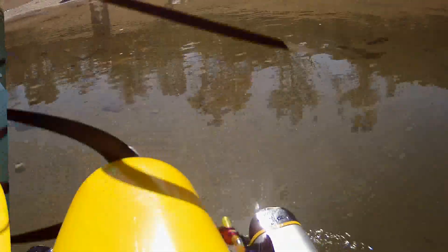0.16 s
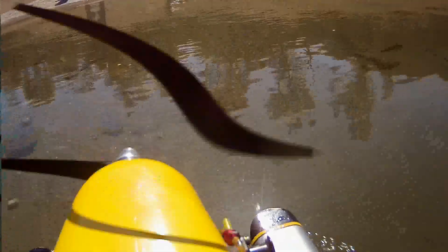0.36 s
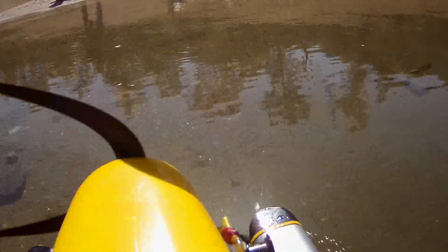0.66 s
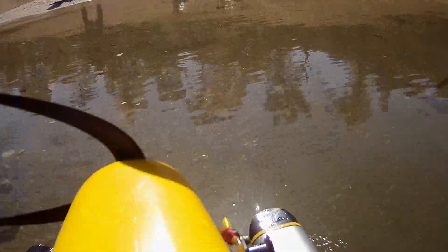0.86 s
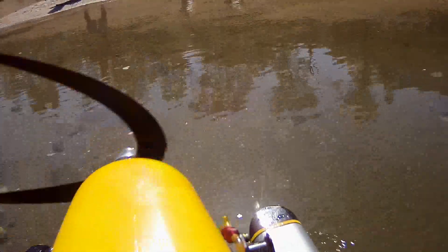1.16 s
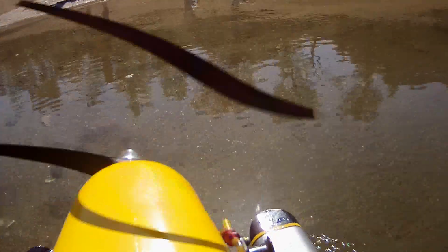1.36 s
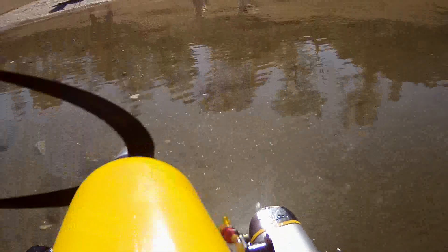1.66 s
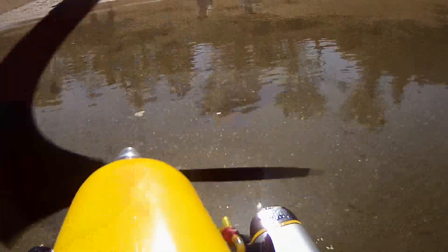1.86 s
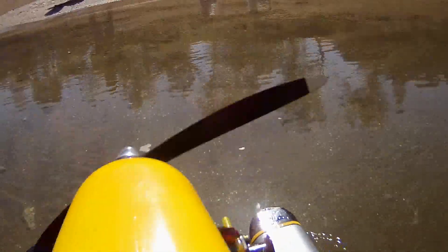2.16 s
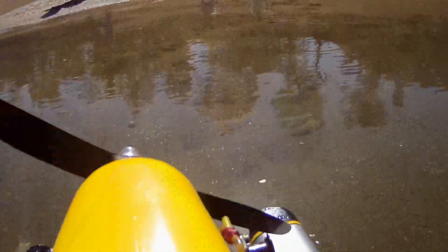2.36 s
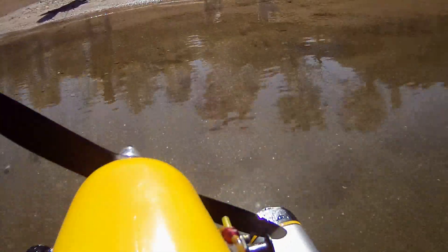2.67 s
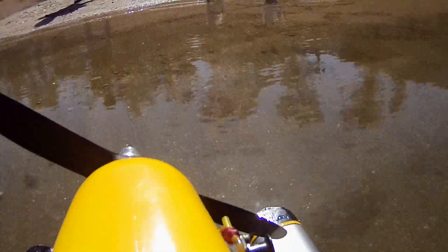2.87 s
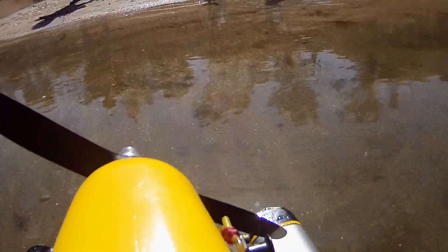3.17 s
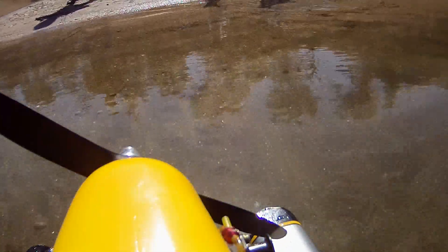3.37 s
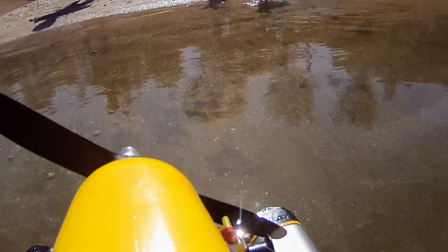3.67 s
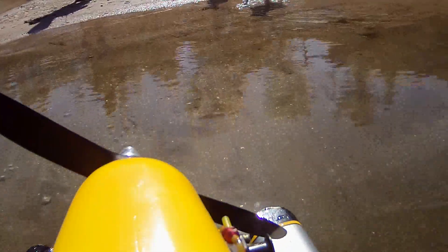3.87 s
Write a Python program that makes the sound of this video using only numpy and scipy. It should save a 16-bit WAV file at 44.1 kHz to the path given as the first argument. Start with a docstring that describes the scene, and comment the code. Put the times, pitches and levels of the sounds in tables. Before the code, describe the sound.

A small petrol engine on a model floatplane throbs loudly and steadily at a low, buzzing pitch, crackling with exhaust gas until about 0.55 s. The throttle closes: uneven soft puffs, with sharp pops until about 1.3 s, mix with hollow knocks and loose metallic rattling. Firings end near 1.8 s; knocks weaken and stop by 2.5 s. Low rocking fades, leaving faint open air and a thin high whine until 4 s.

```python
"""On board a model floatplane on a calm lake: a small petrol engine throbs steadily, gas crackling in every cycle.
The throb is a stack of partials locked to the firing rate; the gas is coloured noise, with a few sharp pops.
The throttle closes: stray firings puff as single swings of pressure while the slowing piston knocks the airframe,
rings its modes and shakes loose parts. The frame's rocking dies away with the last knocks,
leaving faint open air (coloured noise) and a thin electrical whine (wavering sines)."""
import sys
import numpy as np
from scipy import signal
from scipy.fft import rfft, irfft
from scipy.io import wavfile
from scipy.ndimage import uniform_filter1d

SR = 44100
rng = np.random.default_rng(int(sys.argv[2]) if len(sys.argv) > 2 else 0)


def generate_wav(signal):
    """Clip the signal to [-1, 1] and save it as 16-bit WAV at the path in sys.argv[1]."""
    frames = np.transpose(np.atleast_2d(signal))
    scaled = np.clip(frames, -1, 1) * 32767
    pcm = np.round(scaled).astype(np.int16)
    wavfile.write(sys.argv[1], SR, pcm)


N = 176400


def undb(db):
    """Decibels to gain."""
    return 10 ** (np.asarray(db) / 20)


def unit(x):
    """Scale to rms 1."""
    return x / np.sqrt(np.mean(x ** 2))


def noise():
    """White noise of rms about 1."""
    return rng.standard_normal(N)


def walk(rate_hz):
    """Smooth random curve of rms 1, drawing rate_hz new values a second."""
    step = max(int(SR / rate_hz), 2)
    joined = np.interp(np.arange(N) / step, np.arange(N), noise())
    return unit(uniform_filter1d(joined, step))


def colour(x, points):
    """Causal, minimum-phase filter through (f/Hz, level/dB) points that keeps the power of white noise."""
    hz, db = np.array(points, float).T
    f = np.maximum(np.arange(N // 2 + 1) * SR / N, 1)
    gain = unit(undb(np.interp(np.log(f), np.log(hz), db)))
    # folding the cepstrum forward in time makes the response causal
    cepstrum = irfft(np.log(gain), N)
    cepstrum[1:N // 2] *= 2
    cepstrum[N // 2 + 1:] = 0
    response = irfft(np.exp(rfft(cepstrum)), N)[:N // 8]
    return irfft(rfft(x, 2 * N) * rfft(response, 2 * N))[:N]


def grit(spread_db):
    """Noise made of tiny clicks of uneven size, rms 1."""
    size = np.clip(noise(), -2.5, 2.5)
    return unit(noise() * undb(spread_db * size))


def die_away(kicks, decay_s):
    """Each kick jumps up and falls exponentially."""
    return signal.lfilter([1], [1, -np.exp(-1 / (decay_s * SR))], kicks)


def bursts(rows, decay_s):
    """Envelope that jumps at each (t/s, level/dB) row and dies away."""
    kicks = np.zeros(N)
    for s, db in rows:
        kicks[int(s * SR)] += undb(db)
    return die_away(kicks, decay_s)


CONTACT_S = .0019


def contact(age):
    """A soft blow takes about CONTACT_S to press in."""
    return 1 - np.exp(-(age / CONTACT_S) ** 2)


def ring_down(age, t60):
    """Damping: falls 60 dB in t60 seconds."""
    return np.exp(-np.log(1000) * age / t60)


# ringing modes of the airframe [f/Hz, level/dB, t60/s]
FRAME_MODES = [(207, -13.5, .09), (235.8, -9.5, .15), (292, -9.5, .11), (365, -9.5, .07), (446, -11, 0.091),
               (583.5, -18, .14), (622.5, -23, .13), (707, -32.5, .09), (890, -33.5, .1), (972, -39, .09),
               (1230, -42.5, .06)]


def strike(rows, scatter_db, detune):
    """Each soft (t/s, level/dB) blow rings the airframe modes in a slightly different mix and tuning."""
    out, age = np.zeros(N + SR), np.arange(SR // 5) / SR
    hz, mode_db, t60 = np.array(FRAME_MODES).T[:, :, None]
    for s, blow_db in rows:
        size, shift = rng.uniform(-1, 1, (2, len(FRAME_MODES), 1))
        level = undb(blow_db + mode_db + scatter_db * size)
        tone = np.sin(2 * np.pi * hz * (1 + detune * shift) * age)
        ring = level * ring_down(age, t60) * tone
        start = int(s * SR)
        out[start:start + len(age)] -= contact(age) * ring.sum(0)
    return out[:N]


# partials of the throb [multiple of the firing rate, level/dB]
THROB_PARTIALS = [(.5, -14), (1, -0.5), (1.5, -28), (2, -20), (3, -16.5), (4, -34), (5, -36), (6, -24),
                  (7, -29), (9, -29.5), (11, -34.5)]
ORDER_WANDER = 0.0092  # turns (rms) by which each upper partial wavers


def throb(turns):
    """Exhaust pressure repeats with the firings: partials locked to one phase, the upper ones loosely."""
    total = np.zeros(N)
    for multiple, db in THROB_PARTIALS:
        waver = (multiple > 3.5) * ORDER_WANDER * walk(30)
        total += undb(db) * np.cos(2 * np.pi * multiple * (turns + waver))
    return unit(total) * undb(1.5 * np.tanh(walk(45)))


# colour of the exhaust gas, running and sputtering [f/Hz, level/dB per Hz, relative]
GAS_COLOUR = [(200, 9), (500, 2.5), (800, 3), (1400, 4), (1850, -6), (2150, -2.5), (2500, -8), (2900, -3.5),
              (3250, -9), (3700, -1.5), (4000, -8.5), (4250, -14.5), (5200, -21), (8000, -29),
              (14000, -71.5)]
RUN_GAS_DB, GAS_FADE_DB_PER_S = -28.5, 2
GAS_PULSE_DB, GAS_FLUTTER_DB = 2.5, 5.5


def running_gas(t, turns):
    """Gas rushes out as noise that swells twice a cycle and flutters."""
    pulse_db = GAS_PULSE_DB * np.cos(4 * np.pi * turns)
    flutter_db = GAS_FLUTTER_DB * np.tanh(walk(400))
    gas = unit(undb(pulse_db + flutter_db) * noise())
    return colour(gas, GAS_COLOUR) * undb(RUN_GAS_DB - GAS_FADE_DB_PER_S * t)


# colour of the open exhaust's fine spitting [f/Hz, level/dB per Hz, relative]
SPIT_COLOUR = [(2000, 0.5), (7000, -1.5), (14000, -7), (20000, -12.5)]
SPIT_DB, SPITS_PER_S, SPIT_S = -50.5, 400, .0006


def spitting():
    """The open exhaust spits at random moments: dense, very short bursts of noise."""
    ticks = 1. * (rng.random(N) < SPITS_PER_S / SR)
    return colour(unit(die_away(ticks, SPIT_S) * noise()), SPIT_COLOUR) * undb(SPIT_DB)


# steady firing rate, time of the last even firing, moment the throttle closes
FIRING_HZ, LAST_FIRING_S, CUT_S = 54.3, .542, .556
THROB_DB, RUN_KNOCK_DB = -6, -20.5


def running(t):
    """Even firings drive the throb, the gas and one airframe knock per cycle."""
    turns = FIRING_HZ * (t - LAST_FIRING_S) + 0.014 * walk(25)
    on = np.clip((CUT_S - t) / 0.0035, 0, 1)  # closes over 3.5 ms
    exhaust = undb(THROB_DB) * throb(turns) + running_gas(t, turns) + spitting()
    firings = np.arange(LAST_FIRING_S, 0, -1 / FIRING_HZ)
    late, harder = rng.standard_normal((2, len(firings)))
    blows = zip(np.abs(firings + 0.0014 * late), RUN_KNOCK_DB + 2 * harder)
    return on * exhaust + strike(blows, scatter_db=6, detune=0.039)


# rocking of the frame on its mounts [t/s, level/dB]
ROCKING_LEVEL = [(.55, -16), (1.3, -19), (1.8, -25.5), (1.9, -21), (1.98, -20), (2.09, -35), (2.2, -33.5),
                 (2.34, -40.5), (2.38, -48.5), (2.55, -46.5), (2.63, -52.5), (3.0, -66), (3.3, -77.5)]
# colour of the frame's slack shudder [f/Hz, level/dB per Hz, relative]
SHUDDER_COLOUR = [(12, -13.5), (25, 7.5), (50, -5), (95, -2), (130, -7.5), (200, -22), (400, -28),
                  (1000, -78.5)]
ROCK_HZ, SHUDDER_DB = 60.01, -1


def rocking(t):
    """The frame sways (wandering low tone) and shudders (low noise) on its mounts, dying away."""
    hz = ROCK_HZ * (1 + .07 * walk(20))
    sway = np.sqrt(2) * np.sin(2 * np.pi * np.cumsum(hz) / SR) * undb(-0.5 + 1.6 * walk(25))
    shudder = undb(SHUDDER_DB) * colour(noise(), SHUDDER_COLOUR)
    return undb(np.interp(t, *np.array(ROCKING_LEVEL).T)) * (sway + shudder)


# colour of the faint open air [f/Hz, level/dB per Hz, relative]
AIR_COLOUR = [(20, -10), (62, 0), (100, -4.5), (140, -12), (168, -8.5), (230, -14), (330, -15),
              (500, -19.5), (1000, -23), (2000, -28.5), (3500, -31.5), (6000, -35.5), (14000, -36.5)]
AIR_DB = -62.5


def lake_air():
    """Faint open air over the lake: coloured noise that drifts slightly in level."""
    return colour(noise(), AIR_COLOUR) * undb(AIR_DB + .6 * walk(4))


# thin electrical whine [f/Hz, level/dB, rms wobble/Hz]
WHINE_TONES = [(3740, -82, 40), (12000, -91, 4)]


def whine():
    """Each electrical tone is a sine whose pitch wavers at random."""
    total = np.zeros(N)
    for hz, db, wobble in WHINE_TONES:
        cycles = np.cumsum(hz + wobble * walk(150)) / SR
        total += undb(db) * np.sqrt(2) * np.sin(2 * np.pi * cycles)
    return total


# sharp exhaust pops [t/s, level/dB before colouring]
POP_TIMES = [(0.059, -15), (.096, -19.5), (.177, -16), (.215, -18), (.374, -26), (0.448, -26),
             (0.5253, -18.5), (.616, -23), (0.654, -11), (0.693, -19.5), (0.8726, -18), (1.027, -27.5),
             (1.119, -29.5), (1.25, -38), (1.295, -46)]
# sputtering puffs [t/s, relative pressure level/dB, f/Hz, relative hiss level/dB]
PUFF_TIMES = [(0.584, -3, 64.5, -30), (0.624, -4, 62.7, -36), (.636, -5, 66, -47.5),
              (0.672, -0.5, 58, -28.5), (.712, -4, 61.3, -34.5), (0.753, -8.5, 69.3, -58),
              (0.798, -4.5, 65, -38.5), (0.839, -6, 52.3, -43), (0.889, 0.5, 63.2, -32),
              (0.931, -1.5, 60, -38), (0.966, -9, 56, -64), (1.024, -3, 61.4, -35.5),
              (1.061, -22, 45.8, -54.5), (1.116, -2.5, 62.4, -35.5), (1.154, -15, 46, -66.5),
              (1.214, -2.5, 54.2, -48.5), (1.257, -6, 52.7, -46), (1.272, -3, 53, -44),
              (1.304, -6.5, 56.6, -59), (1.365, -21, 40.7, -53.5), (1.414, -11.5, 44, -58),
              (1.476, -3.5, 49, -53), (1.52, -8.5, 54.5, -50), (1.534, -3.5, 65.7, -69.5),
              (1.571, -8.5, 46.5, -54.5), (1.632, -5, 41.3, -56), (1.693, -4.5, 61.7, -58),
              (1.733, -5, 48.4, -61.5), (1.802, -8.5, 42, -55)]
# small cracks of gas [t/s, level/dB before colouring]
CRACK_TIMES = [(.577, -26.5), (.586, -25), (.591, -25), (.674, -24.5), (.717, -30), (.801, -28),
               (.831, -37.5), (.884, -34), (.8945, -25.5), (.933, -28)]
PUFF_DB, PUFF_CYCLES = -1.8, 0.7
HISS_DB, HISS_S, CRACK_S = -0.5, 0.0083, .0015
POP_DECAY_S, POP_RING_HZ, POP_RING_DB = .003, 1432, -10
PIPE_HZ, PIPE_DB, PIPE_S = 165.3, -14, 0.012  # low ring of the exhaust pipe after each puff


def sputter(t):
    """Stray firings swing the pressure once and hiss; pops ring the muffler, puffs ring the pipe."""
    thump, hiss = np.zeros(N), np.zeros(N)
    for s, db, hz, hiss_db in PUFF_TIMES:
        near = slice(int(s * SR) - SR // 10, int(s * SR) + SR // 10)
        age = t[near] - s
        swing = 2 * np.pi * hz * age
        swell = np.exp(-(age * hz / PUFF_CYCLES) ** 2)
        thump[near] += undb(db) * swell * (np.cos(swing) + 0.14 * np.cos(2 * swing))
        hiss[near] += undb(hiss_db) / np.cosh(age / HISS_S)
    pops = bursts(POP_TIMES, POP_DECAY_S)
    cracks = bursts(CRACK_TIMES, CRACK_S)
    crackle = unit(grit(spread_db=4.0) * undb(6.2 * np.tanh(walk(250))))
    gas = undb(HISS_DB) * hiss * crackle + (pops + cracks) * noise()
    muffler = undb(POP_RING_DB) * pops * np.sin(2 * np.pi * POP_RING_HZ * t)
    puffs = bursts([row[:2] for row in PUFF_TIMES], PIPE_S)
    pipe = undb(PIPE_DB) * puffs * np.sin(2 * np.pi * PIPE_HZ * t)
    soften = signal.butter(4, 2 * PIPE_HZ, fs=SR, output="sos")
    return undb(PUFF_DB) * thump + colour(gas, GAS_COLOUR) + muffler + signal.sosfilt(soften, pipe)


# knocks of the slowing piston, shared by thuds, frame and fittings [t/s, relative level/dB, f/Hz]
PISTON_KNOCKS = [(0.6347, -12.5, 304), (0.6473, -20, 425), (0.6835, -18, 289.0), (0.716, -13.5, 309.0),
                 (0.7607, -14.5, 333), (0.8086, -17.5, 324), (0.8663, -14, 301.0), (0.8921, -18, 353),
                 (0.942, -17.5, 302), (0.9837, -18.5, 341), (1.0338, -17, 325), (1.0777, -19, 327),
                 (1.1247, -15.5, 308), (1.178, -19.5, 375), (1.2302, -13.5, 338), (1.2768, -15.5, 301),
                 (1.33, -17, 315), (1.3853, -17, 320), (1.442, -17, 314), (1.4955, -15.5, 320),
                 (1.5437, -16.5, 312), (1.5999, -17.5, 299), (1.6538, -14.5, 310), (1.704, -17.5, 384.0),
                 (1.765, -19, 310), (1.8303, -16.5, 308.0), (1.8508, -25, 287), (1.8869, -17.5, 305),
                 (1.9258, -27.5, 326.0), (1.9665, -23, 296), (2.005, -23, 340), (2.1202, -29, 302),
                 (2.2117, -29, 322.0), (2.2392, -26, 309), (2.353, -49, 338), (2.5216, -51.5, 298.0)]
THUD_DB, THUD_T60_S = -.5, 0.059


def thuds():
    """Each turnover jolts the engine mount: a few damped cycles with their own pitch."""
    out, age = np.zeros(N), np.arange(SR // 5) / SR
    shape = contact(age) * ring_down(age, THUD_T60_S)
    shape /= shape.max()
    for s, db, hz in PISTON_KNOCKS:
        start = int(s * SR)
        out[start:start + len(age)] -= undb(db) * shape * np.sin(2 * np.pi * hz * age)
    return undb(THUD_DB) * out


# colour of the loose fittings [f/Hz, level/dB per Hz, relative]
RATTLE_COLOUR = [(250, -5), (380, 7), (520, -10), (640, -6), (790, -17.5), (950, -18.5), (1500, -32.5),
                 (2000, -46), (3200, -44), (3900, -43), (5500, -57.5), (12000, -74)]
RATTLE_DB, RATTLE_S, RATTLE_LOW_HZ = -14.5, 0.032, 420


def rattle(blows):
    """Loose fittings rattle after each knock: a soft-edged burst of gritty noise, thinned below."""
    shaken = uniform_filter1d(bursts(blows, RATTLE_S), size=560)
    gritty = unit(grit(spread_db=3.5) * undb(np.tanh(walk(250))))
    thin = signal.butter(4, RATTLE_LOW_HZ, "high", fs=SR, output="sos")
    return undb(RATTLE_DB) * signal.sosfilt(thin, colour(shaken * gritty, RATTLE_COLOUR))


# loose metal parts chattering [t/s, level/dB before smoothing and colouring]
CHATTER_TIMES = [(.742, -52.5), (0.831, -52), (.965, -54), (1.057, -55.5), (1.148, -55), (1.33, -63),
                 (1.356, -60), (1.406, -58), (1.478, -54.5), (1.512, -57.5), (1.569, -58), (1.633, -52),
                 (1.677, -59), (1.73, -62), (1.802, -60), (1.841, -59), (1.9, -61.5), (1.921, -57),
                 (1.97, -61.5), (2.009, -58), (2.043, -66), (2.079, -68), (2.114, -64.5), (2.218, -68)]
# colour of the metal parts [f/Hz, level/dB per Hz, relative]
METAL_COLOUR = [(2000, -33.5), (2900, -14), (3270, -0.5), (3520, -15.5), (3880, 3), (4300, -4), (4600, -4),
                (5000, -21.5), (5700, -29), (6080, -12), (6400, -21.5), (12000, -44)]
CHATTER_S = 0.0071


def chatter():
    """Loose metal parts chatter: short bursts of bright, gritty noise."""
    shaken = uniform_filter1d(bursts(CHATTER_TIMES, CHATTER_S), size=180)
    return colour(shaken * grit(spread_db=5), METAL_COLOUR)


# dry clacks of the linkage as the shaft stops [t/s, level/dB before colouring]
CLACK_TIMES = [(1.207, -33), (1.477, -39.5), (1.676, -39.5), (1.73, -46.5), (1.809, -43.5), (1.85, -41.5),
               (2.016, -43), (2.119, -54), (2.163, -59), (2.26, -47.5), (2.357, -67)]
# colour of a clack [f/Hz, level/dB per Hz, relative]
CLACK_COLOUR = [(300, -12.5), (700, 6.5), (1100, 1), (1600, -6), (2100, -20.5), (3800, -23.5),
                (6000, -35.5), (14000, -62)]


def clacks():
    """The linkage clacks dryly: sudden noise that dies in milliseconds."""
    return colour(bursts(CLACK_TIMES, decay_s=0.005) * noise(), CLACK_COLOUR)


def piston():
    """The slowing piston knocks mount and frame; fittings rattle, metal chatters, the linkage clacks."""
    blows = [row[:2] for row in PISTON_KNOCKS]
    frame = strike(blows, scatter_db=3, detune=.04)
    return thuds() + frame + rattle(blows) + chatter() + clacks()


FRAME_RING_S, FRAME_RING_HZ, FRAME_RING_DB, FRAME_RING_LENGTH_S = 2, 639, -46, 0.016


def frame_ring(t):
    """One soft ring of the airframe: a sine under a short bell-shaped swell."""
    swell = np.exp(-((t - FRAME_RING_S) / FRAME_RING_LENGTH_S) ** 2)
    return undb(FRAME_RING_DB) * swell * np.sin(2 * np.pi * FRAME_RING_HZ * t)


def scene():
    """All sources at the on-board microphone."""
    t = np.arange(N) / SR
    engine = running(t) + sputter(t) + piston() + frame_ring(t)
    return (engine + rocking(t) + lake_air() + whine())[None]


CEILING, TOP_HZ = 1.05, 14400


def record(dry):
    """The recorder rounds the highest peaks and cuts the top."""
    rounded = dry / (1 + (dry / CEILING) ** 8) ** (1 / 8)
    top_cut = signal.ellip(8, .2, 70, TOP_HZ, fs=SR, output="sos")
    return signal.sosfilt(top_cut, rounded)


dry = scene()
out = record(dry)
generate_wav(out)
```